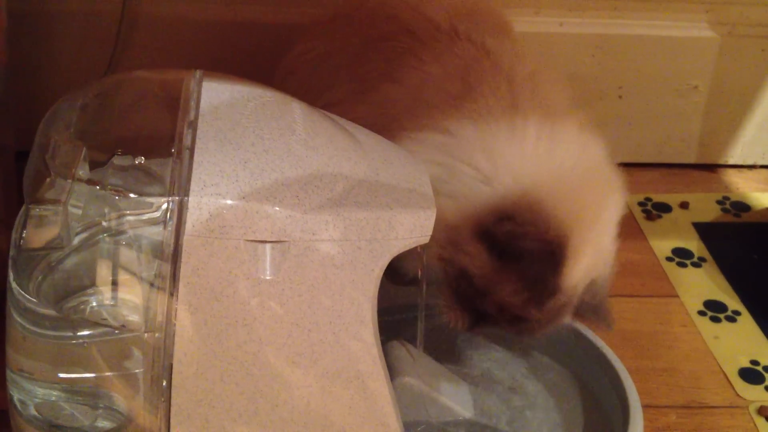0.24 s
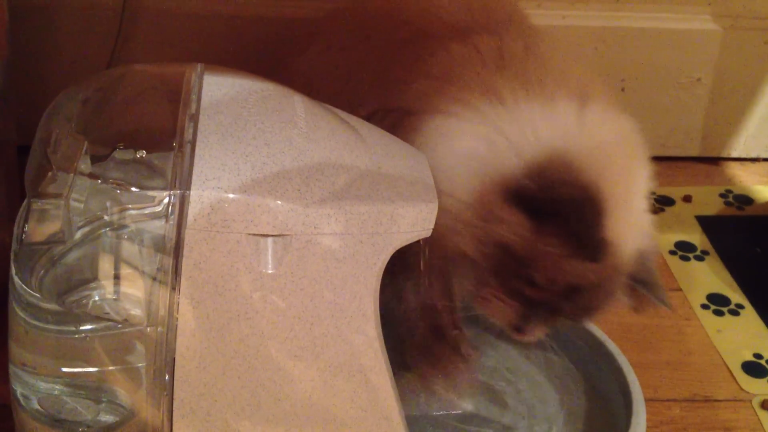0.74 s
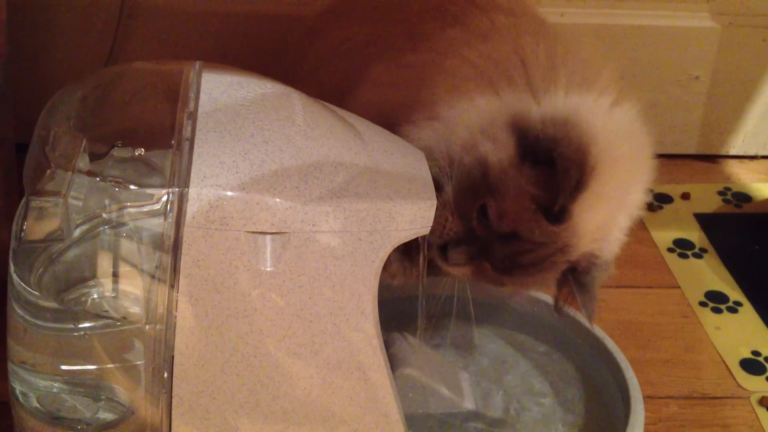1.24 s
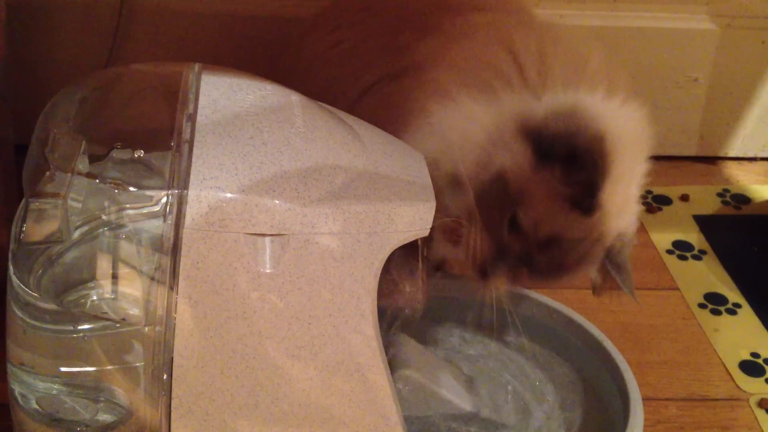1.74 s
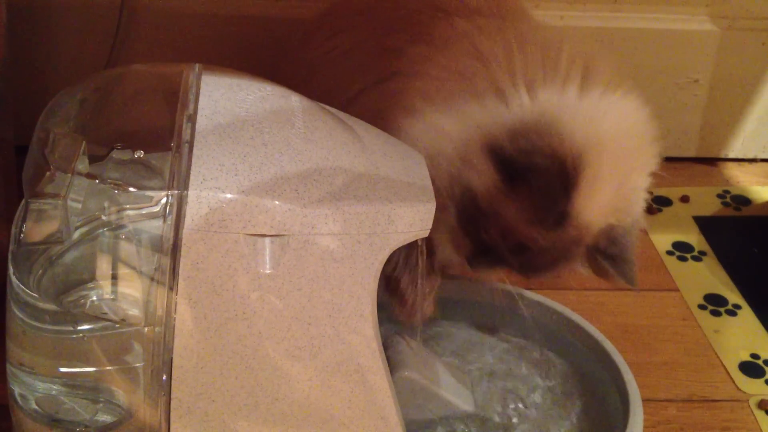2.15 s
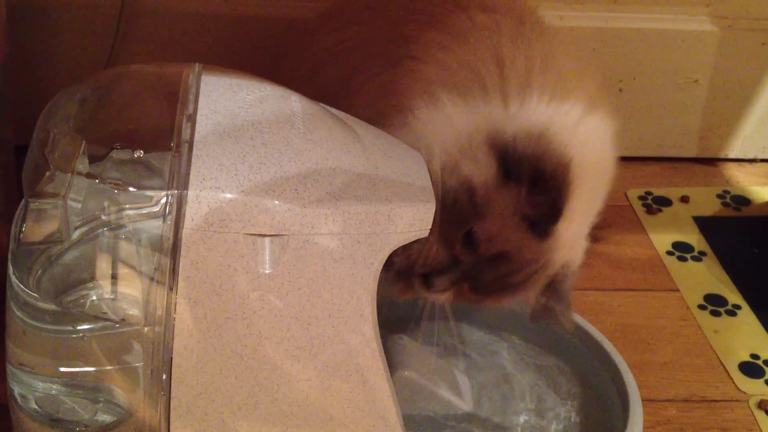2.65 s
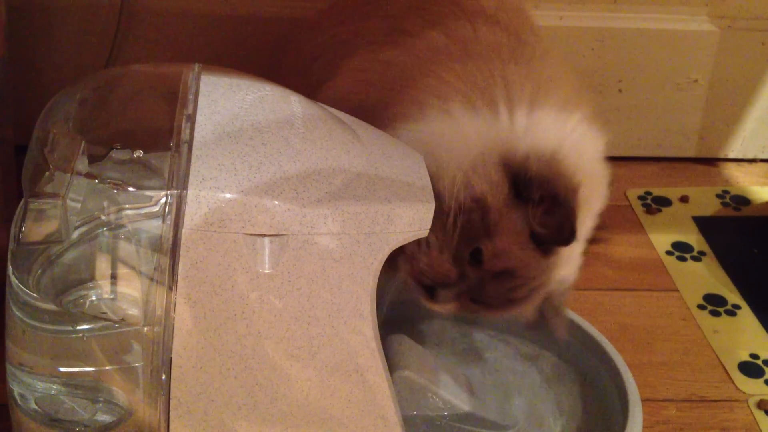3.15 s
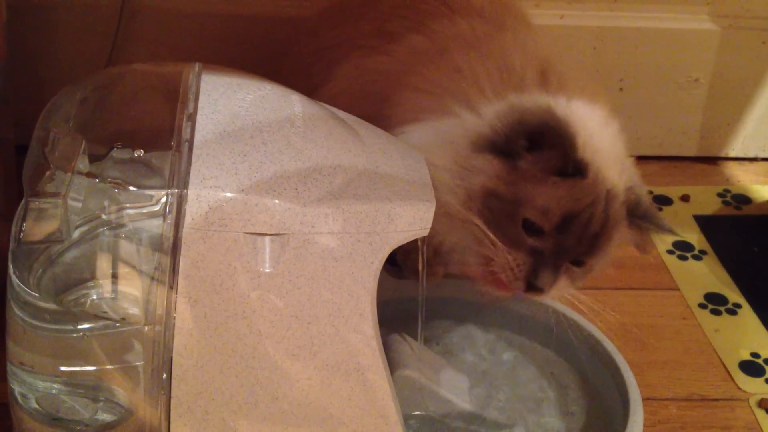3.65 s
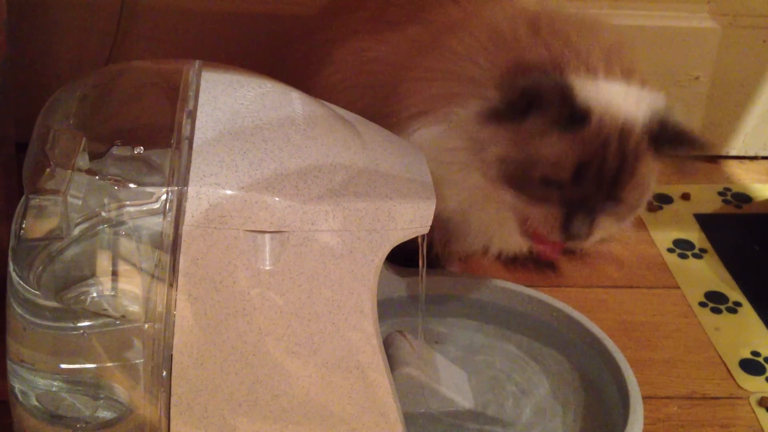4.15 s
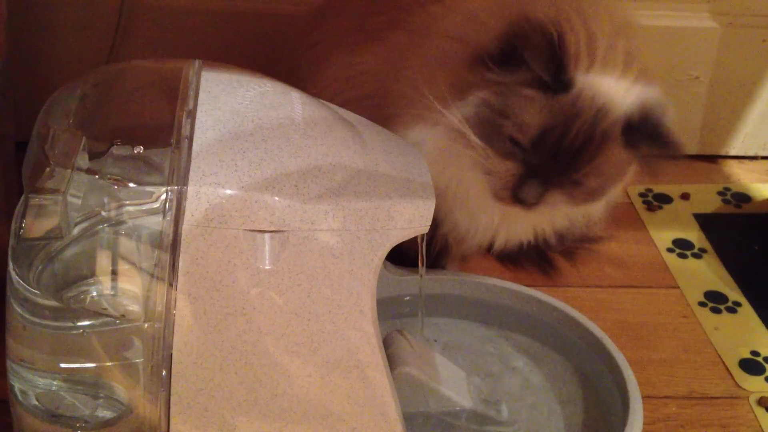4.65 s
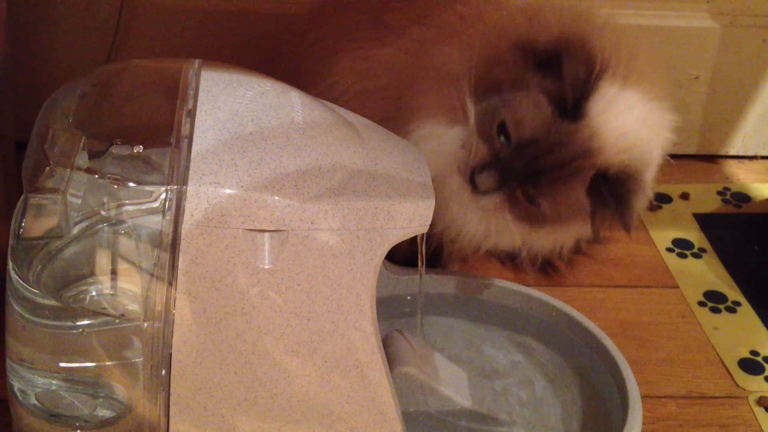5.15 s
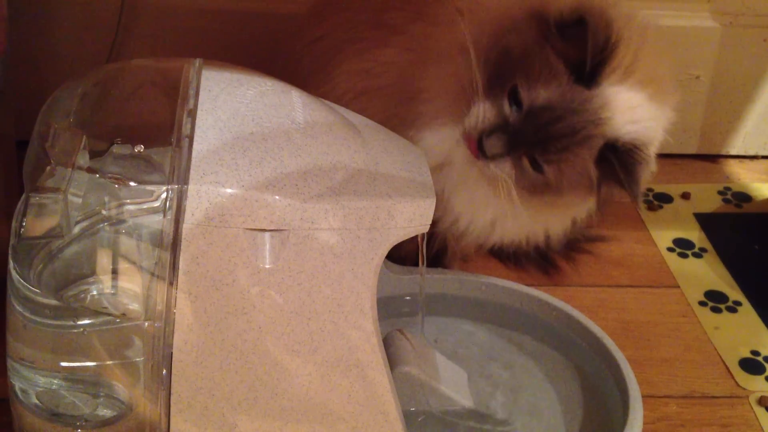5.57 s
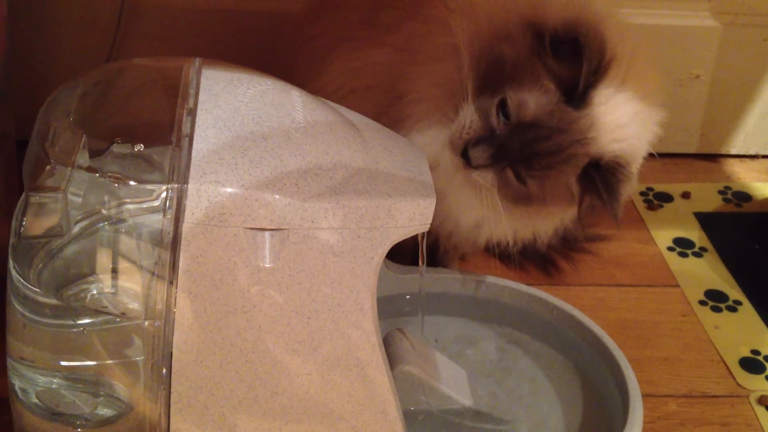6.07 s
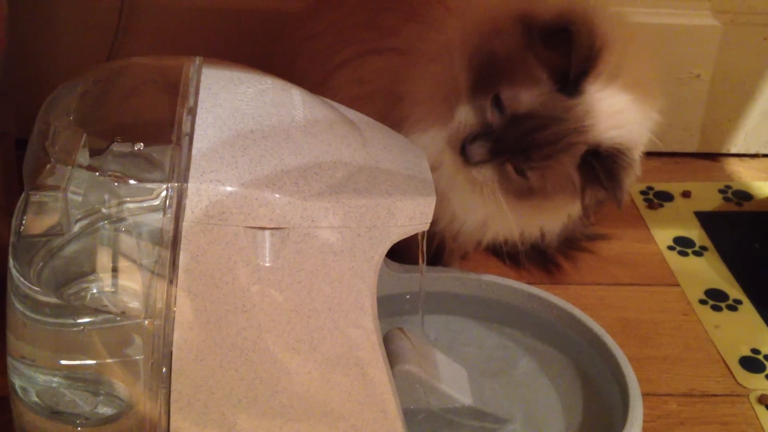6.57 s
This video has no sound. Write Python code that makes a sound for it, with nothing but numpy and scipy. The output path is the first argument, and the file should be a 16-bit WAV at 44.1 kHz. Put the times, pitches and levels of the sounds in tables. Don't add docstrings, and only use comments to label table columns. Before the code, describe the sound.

A cat dabs at a trickling plastic drinking fountain, sparse bright plinks building to a brief burst of slaps and booming plops, then near stillness.

```python
import sys
import numpy as np
from scipy import signal
from scipy.fft import rfft, irfft, next_fast_len
from scipy.io import wavfile
from scipy.ndimage import map_coordinates

SR = 44100
rng = np.random.default_rng(int(sys.argv[2]) if len(sys.argv) > 2 else 0)


def pcm_store(signal):
    levels = np.round(np.clip(np.atleast_2d(signal), -1, 1) * 32767)
    wavfile.write(sys.argv[1], SR, levels.astype(np.int16).T)


def boost_factor(decibels):
    exponent = np.asarray(decibels, float) / 20
    return 10 ** exponent


N = 299880


def bubble(hz, t60_s, rise_s, climb):
    t = np.arange(round(1.2 * t60_s * SR)) / SR
    phase = 2 * np.pi * hz * (t + climb * t * t / (2 * t60_s))
    return np.sin(phase) * boost_factor(-60 * t / t60_s) * (1 - np.exp(-t / rise_s))


def puff(db, t60_s):
    t = np.arange(round(t60_s * SR)) / SR
    return boost_factor(db - 60 * t / t60_s) * (1 - np.exp(-t / 0.00063))


def add(track, start_s, sound):
    part = track[round(start_s * SR):][:len(sound)]
    part += sound[:len(part)]


# (frequency [Hz], level [dB])
SPRAY_SPECTRUM = [(900, -4.5), (2000, -9), (4000, -6.5), (5200, -11), (6600, -4), (7600, -6.5),
                  (9500, -12.5), (11500, -21.5)]
# (frequency [Hz], level [dB])
MIST_SPECTRUM = [(8000, -30), (11000, -22.5), (13000, -16.5), (15500, -24.5)]


def drops(table, t60_s, rise_s):
    plinks, spray, mist = np.zeros((3, N))
    mist_under_spray_db = -16
    for start_s, db, hz, climb, spray_db in table:
        add(plinks, start_s, boost_factor(db + 6.5) * bubble(hz, t60_s(hz), rise_s, climb))
        add(spray, start_s, puff(spray_db - 1.5, t60_s=0.042))
        add(mist, start_s, puff(spray_db + mist_under_spray_db + 1.0, t60_s=0.031))
    return plinks + spray * coloured(SPRAY_SPECTRUM) + mist * coloured(MIST_SPECTRUM)


# (time [s], peak [dB], bubble [Hz], pitch climb [0-1], spray [dB])
RINGING_DROPS = [(1.1084, -54, 2770, 0.3, -65), (1.5432, -52.5, 3100, 0.26, -65),
                 (1.7694, -52.5, 2530, 0.25, -63), (1.9054, -29.5, 2846, 0, -41.5),
                 (2.064, -27.5, 5390, 0, -55), (2.15, -39.5, 7500, 0.3, -55), (2.482, -56, 2370, 0.1, -69),
                 (2.619, -44.5, 4060, .12, -63), (2.8398, -35.5, 2910, .3, -53),
                 (2.9201, -33.5, 4310, 0.06, -40), (2.9757, -39, 2080, 0.5, -70),
                 (2.9964, -55, 2060, 0, -56), (3.264, -31, 3200, 0, -64), (3.2707, -43, 2520, 0, -72),
                 (3.4194, -60, 2360, .12, -60), (3.7302, -42.5, 7430, 0.37, -60),
                 (3.9, -48, 2050, 0.1, -63), (5.0975, -55, 3160, 0.05, -69), (6.5384, -56, 3080, 0.2, -57)]


def ringing_drops():
    decay_cycles = 35.7
    return drops(RINGING_DROPS, lambda hz: decay_cycles / hz, rise_s=0.00077)


# (time [s], peak [dB], bubble [Hz], spray [dB])
RISING_BUBBLES = [
    (3.0145, -37, 2100, -63),
    (3.037, -41.5, 2870, -66),
    (3.048, -44, 3820, -57),
    (3.089, -43, 3020, -50),
]


def rising_bubbles():
    climb_hz = 1640
    table = [(start_s, db, hz, climb_hz / hz, spray_db) for start_s, db, hz, spray_db in RISING_BUBBLES]
    return drops(table, lambda hz: 0.024, rise_s=0.002)


# (time [s], slap [dB], bubble [dB], bubble [Hz], spray [dB])
SURFACE_SLAPS = [(0.7102, -48, -52.5, 2340, -58.5), (1.259, -44.5, -45, 4880, -57),
                 (1.7696, -57, -60, 3000, -75), (2.5583, -43, -55, 3400, -73), (2.888, -45, -53, 3090, -65),
                 (2.974, -37, -53, 3020, -63), (3.034, -52, -47, 3340, -45), (3.0789, -51, -37, 2380, -52),
                 (3.1919, -47, -42, 3160, -56.5), (3.2116, -40, -39, 2820, -52),
                 (3.257, -34, -52, 3000, -55), (3.3446, -35.5, -31, 2620, -47),
                 (3.7379, -50, -62, 3430, -72), (3.9015, -53, -38, 2730, -62),
                 (5.3883, -53, -64, 3600, -70), (6.1022, -58, -45.5, 7100, -50.5),
                 (6.273, -54, -53, 3450, -66), (6.5135, -60, -56, 3560, -62)]
# (frequency [Hz], level [dB])
SLAP_SPECTRUM = [(700, -43), (1500, 11), (2100, -1.5), (3000, -1), (3800, 4), (5500, -34)]


def slaps():
    clicks, wake = np.zeros((2, N))
    for start_s, db, *_ in SURFACE_SLAPS:
        clicks[round(start_s * SR) + 12] = boost_factor(db + 15)
        add(wake, start_s, puff(db - 10.5, t60_s=0.024))
    cracks = filtered(clicks, lambda hz: boost_factor(along(SLAP_SPECTRUM, hz)))
    return cracks + wake * coloured(SLAP_SPECTRUM)


# (time [s], peak [dB], bubble [Hz], spray [dB])
BLUNT_DROPS = [(1.0736, -56, 3280, -70), (1.4202, -52, 3140, -75), (1.459, -53, 3120, -78),
               (1.7793, -52, 3290, -71), (2.153, -53, 3300, -75), (2.4927, -52, 3120, -65),
               (2.5194, -57, 3120, -67), (2.5734, -56, 6900, -68), (2.601, -47, 6170, -50),
               (2.6455, -66, 3910, -56.5), (2.8395, -34, 2770, -72), (2.851, -46, 3400, -70),
               (2.9494, -43, 4660, -54), (3.113, -46, 8100, -50), (3.1304, -56, 3620, -56),
               (3.2265, -41, 6140, -45), (3.3004, -50, 2860, -52), (4.2467, -60, 5960, -72),
               (4.42, -63, 6500, -65), (4.749, -62, 6000, -62), (4.9596, -54, 3200, -61),
               (5.27, -64, 7500, -75), (5.5741, -62, 6200, -72), (5.5966, -60, 6700, -60),
               (5.625, -65, 9300, -68), (5.6385, -53.5, 2680, -61), (5.7346, -55, 2330, -65),
               (5.7577, -60, 7000, -59), (6.1716, -62, 6400, -62)]


def blunt_drops():
    climb = 0.069
    popped = [(start_s, db, hz, spray_db) for start_s, _, db, hz, spray_db in SURFACE_SLAPS]
    table = [(start_s, db, hz, climb, spray_db) for start_s, db, hz, spray_db in BLUNT_DROPS + popped]
    return drops(table, lambda hz: 0.0045, rise_s=0.00025)


# (time [s], peak [dB])
MIST_FLICKS = [(.895, -60), (1.0736, -64), (1.893, -61), (2.15, -56), (2.4418, -64), (2.4554, -66),
               (2.5734, -66), (2.602, -66), (2.84, -60), (2.9201, -47), (3.0145, -56), (3.0334, -47.5),
               (3.048, -61), (3.1304, -61), (3.1896, -60), (3.263, -48), (3.7302, -64), (4.3494, -66),
               (4.749, -65), (5.7346, -65), (6.104, -60), (6.5397, -62)]


def flicks():
    mist = np.zeros(N)
    for start_s, db in MIST_FLICKS:
        add(mist, start_s, puff(db + 3.0, t60_s=0.024))
    return mist * coloured(MIST_SPECTRUM)


# (time [s], peak [dB], bubble [Hz])
DIG_GULPS = [(2.889, -25.5, 440), (2.893, -28.5, 640), (2.921, -26, 890), (2.931, -32, 675),
             (2.945, -32, 1070), (2.9735, -23, 840), (2.982, -21, 783), (2.983, -26, 950),
             (3.019, -42, 743), (3.037, -29, 1410), (3.079, -30, 904), (3.083, -34.5, 710),
             (3.083, -38, 1160), (3.094, -44, 680), (3.121, -28, 1400), (3.193, -40, 900),
             (3.1933, -26.5, 1064), (3.197, -19, 760), (3.209, -19.5, 870), (3.219, -22.5, 860),
             (3.229, -25, 1060), (3.235, -25, 850), (3.249, -31, 780), (3.261, -31.5, 744),
             (3.345, -20, 800), (3.3475, -16, 917), (3.352, -34, 1120), (3.36, -42, 950),
             (3.374, -30.5, 880)]
# (time [s], peak [dB], bubble [Hz])
LONE_PLOPS = [(.0005, -39.5, 840), (.003, -34.5, 1410), (.017, -50, 1500), (1.092, -43.5, 865),
              (1.26, -42.5, 880), (1.2595, -48, 1150), (1.907, -45, 1110), (2.558, -50, 317),
              (2.559, -41, 950), (2.572, -38.5, 860), (2.633, -38, 854), (2.839, -43, 353),
              (6.282, -49, 840)]
HOUSING_MODE_HZ = [370, 406, 597, 728, 805, 883, 1078, 1169, 1324]
# (width [Hz], level [dB])
HOUSING_MODES = [(31.5, 11.5), (25, 8.5), (29.4, 0.5), (60.4, 11.5), (39, 10), (39, 6), (55, 4.5),
                 (44.7, 6.5), (61.5, 0)]


def gulps():
    water = np.zeros(N)
    for table, t60_s in [(DIG_GULPS, 0.011), (LONE_PLOPS, 0.0096)]:
        for start_s, db, hz in table:
            add(water, start_s, boost_factor(db) * bubble(hz, t60_s, rise_s=0.0017, climb=0.46))
    modes = [(hz, width_hz, db) for hz, (width_hz, db) in zip(HOUSING_MODE_HZ, HOUSING_MODES)]
    return boost_factor(-6) * water + boost_factor(5.0) * filtered(water, resonances(modes))


def swarm(times_s, levels_db, count, low_hz, span, cycles):
    out = np.zeros(N)
    for u, pitch, size in rng.random((count, 3)):
        at_s = times_s[0] + u * (times_s[-1] - times_s[0])
        hz = low_hz * span ** pitch
        db = np.interp(at_s, times_s, levels_db) - 3 * np.log(size + 0.022)
        add(out, at_s, boost_factor(db) * bubble(hz, cycles / hz, rise_s=1 / hz, climb=0.04))
    return out


# (time [s], hold [s], slosh [dB], fizz [dB])
PAW_STROKES = [
    (.001, 0.011, -61.5, -63),
    (2.537, 0.029, -69, -75),
    (2.901, 0.064, -42.5, -59),
    (2.982, .11, -51, -55),
    (3.196, .05, -45.5, -57),
    (3.338, 0.014, -52, -57.5),
]
# (frequency [Hz], level [dB])
SHEET_SPECTRUM = [(1000, 3), (2000, 8), (3500, -1.5), (4500, -13), (5300, -39), (7000, -27), (10000, -36)]


def churn():
    attack_s, release_s, fizz_lag_s = 0.01, 0.08, 0.02
    shape_db = np.array([3, 0, 0, -20])
    t = np.arange(N) / SR
    out, sheet = np.zeros((2, N))
    for start_s, hold_s, slosh_db, fizz_db in PAW_STROKES:
        times_s = np.maximum(start_s + np.array([-attack_s, 0, hold_s, hold_s + release_s]), 0)
        late_s = times_s + min(fizz_lag_s, start_s)
        out += swarm(times_s, slosh_db + 7.0 + shape_db, count=80, low_hz=423, span=3.4, cycles=6.5)
        out += swarm(late_s, fizz_db - 2 + shape_db, count=140, low_hz=1500, span=2.99, cycles=7.1)
        sheet += boost_factor(np.interp(t, late_s, fizz_db + shape_db, left=-200, right=-200))
    return out + boost_factor(-7 + 8.4 * wobble(150)) * sheet * coloured(SHEET_SPECTRUM)


# (time [s], level [dB])
TRICKLE_LEVEL = [(0, -71), (1.6, -71), (2.2, -75), (6.8, -85)]


def trickle():
    times_s, levels_db = np.transpose(TRICKLE_LEVEL)
    return swarm(times_s, levels_db, count=2500, low_hz=2230, span=2.0, cycles=24)


# (frequency [Hz], width [Hz], level [dB])
MURMUR_MODES = [(156.6, 9.6, -2.5), (249.6, 8.8, -2), (376, 8.3, -21), (583, 31, -2.5), (870, 24, 2),
                (1078, 37, -4.5), (1767, 5.4, -6.5), (3120, 740, -24.5)]
# (time [s], level [dB])
STREAM_LEVEL = [(0, -62.5), (1.2, -62), (2.4, -61.5), (3.6, -62), (4.6, -62), (5.5, -64), (6.2, -62.5),
                (6.8, -63)]


def stream():
    murmur = unit(filtered(rng.standard_normal(N), resonances(MURMUR_MODES)))
    level_db = np.interp(np.arange(N) / SR, *np.transpose(STREAM_LEVEL))
    return boost_factor(level_db - 4.5 + 0.56 * wobble(18)) * murmur


# (frequency [Hz], rms level [dB])
PUMP_LINES = [(50, -89.5), (100, -65.5), (250, -88), (300, -83), (350, -83), (400, -74), (500, -101),
              (600, -79.5), (700, -81.5), (800, -101), (1200, -83), (1250, -87)]


def pump():
    t = np.arange(N) / SR
    hum = np.zeros(N)
    for hz, db in PUMP_LINES:
        unsteady_db = 0.003 * hz * wobble(12)
        hum += boost_factor(db + 3 + unsteady_db) * np.sin(2 * np.pi * hz * t + hz)
    return hum


# (frequency [Hz], density [dB per Hz])
AIR_SPECTRUM = [(15, -65), (25, -25), (70, -17.5), (130, -9), (300, -4.5), (700, -10.5), (1000, -13),
                (1700, -11.5), (2000, -19), (4000, -22), (8000, -24.5), (10000, -32), (12300, -26.5),
                (15000, -25)]


def air():
    return boost_factor(-65.5 + 0.25 * wobble(9)) * coloured(AIR_SPECTRUM)


# (delay [s], level [dB])
WALL_ECHOES = [(.0021, -26), (.0046, -8), (.0079, -13.5), (.0115, -14.5), (.017, -17.5), (.026, -15)]
# (frequency [Hz], t60 [s])
ROOM_DECAY = [(300, 0.43), (1000, 0.13), (3000, 0.23), (8000, 0.15), (15000, 0.1)]


def corner(x, wet_db):
    hz, t, z = signal.stft(rng.standard_normal(SR // 3), SR, nperseg=256)
    decay = boost_factor(-60 * t / along(ROOM_DECAY, hz)[:, None])
    tail = signal.istft(z * decay, SR, nperseg=256)[1]
    response = boost_factor(wet_db) * np.pad(tail, (180, 0)) / np.linalg.norm(tail)
    response[0] = 1
    for delay_s, db in WALL_ECHOES:
        response[round(delay_s * SR)] += boost_factor(db)
    return signal.fftconvolve(x, response)[:N]


def unit(x):
    return x / np.sqrt(np.mean(x ** 2) + 1e-20)


def along(points, hz):
    f, v = np.transpose(points)
    return np.interp(np.log(hz + 1), np.log(f + 1), v)


def filtered(x, response):
    m = next_fast_len(len(x) + 8192)
    return irfft(rfft(x, m) * response(np.fft.rfftfreq(m, 1 / SR)), m)[:len(x)]


def resonances(modes):
    def response(f):
        total = 0
        for k, (hz, width_hz, db) in enumerate(modes):
            damping = 1j * f * width_hz
            total = total + (-1) ** k * boost_factor(db) * damping / (hz * hz - f * f + damping)
        return total
    return response


def coloured(spectrum):
    return unit(filtered(rng.standard_normal(N), lambda hz: boost_factor(along(spectrum, hz))))


def wobble(rate_hz):
    knots = rng.standard_normal(int(N * rate_hz / SR) + 4)
    return map_coordinates(knots, [np.arange(N) * rate_hz / SR])


def scene():
    bubbles = ringing_drops() + rising_bubbles() + blunt_drops()
    small = bubbles + slaps() + flicks() + trickle()
    large = gulps() + churn()
    fountain = stream() + pump() + air()
    return (corner(small, wet_db=-8.5) + corner(large, wet_db=-8.5) + fountain)[None]


def top_cut(x):
    return signal.sosfilt(signal.butter(12, 15940, fs=SR, output="sos"), x)


def record(dry):
    rumble_hz, top_hz = 45, 15400
    mix = filtered(dry[0], lambda hz: (hz < top_hz) * (1j * hz / (rumble_hz + 1j * hz)) ** 2)[None]
    return top_cut(mix)


dry = scene()
out = record(dry)
pcm_store(out)
```